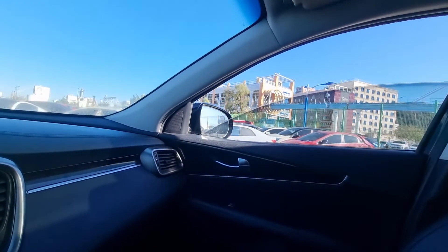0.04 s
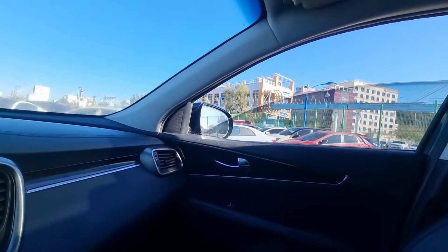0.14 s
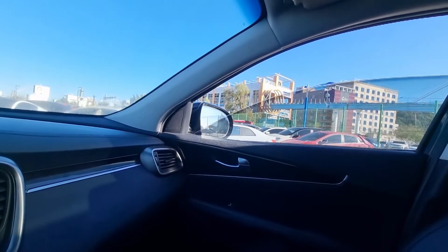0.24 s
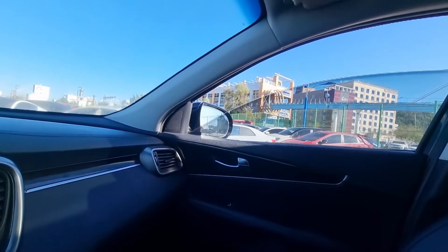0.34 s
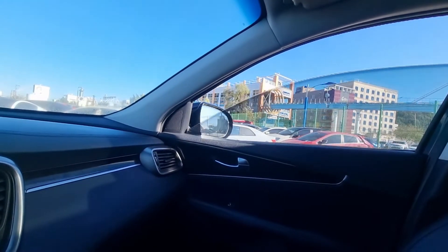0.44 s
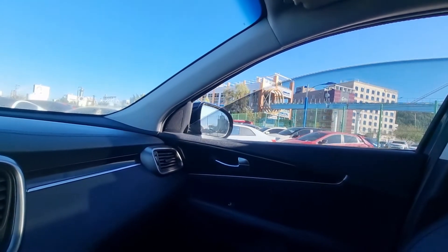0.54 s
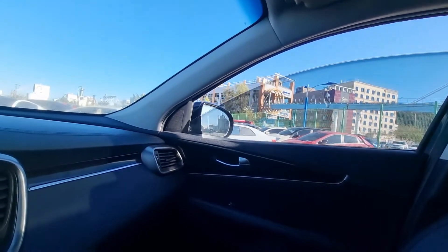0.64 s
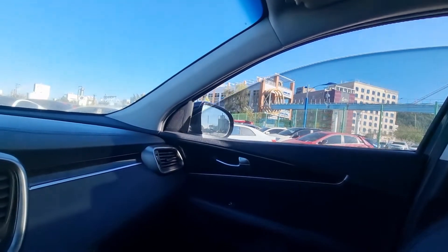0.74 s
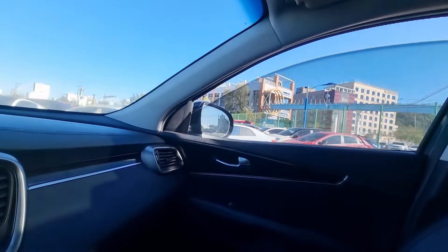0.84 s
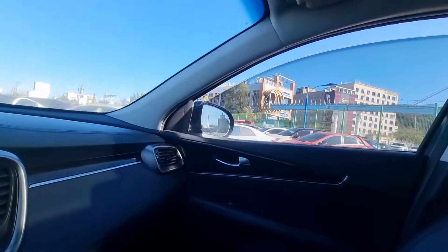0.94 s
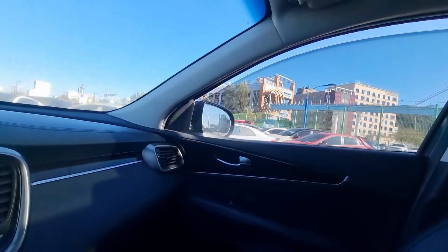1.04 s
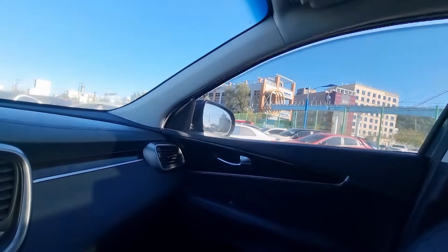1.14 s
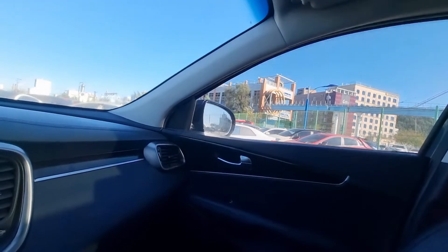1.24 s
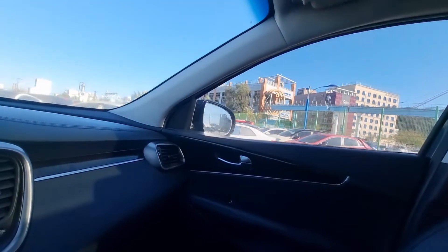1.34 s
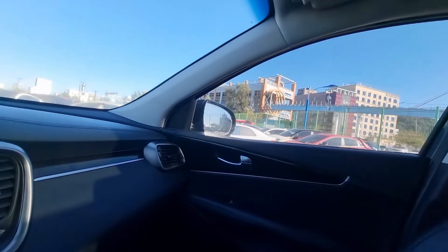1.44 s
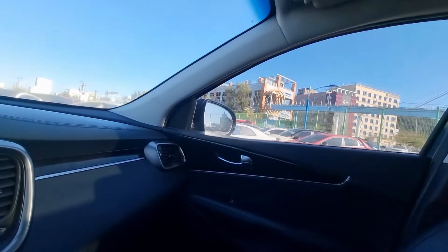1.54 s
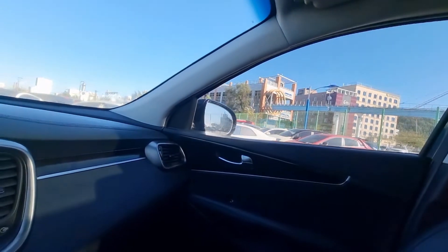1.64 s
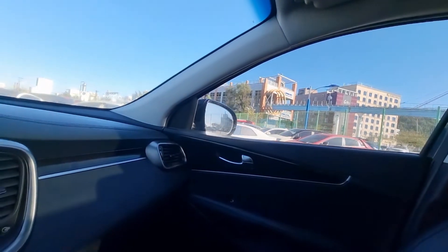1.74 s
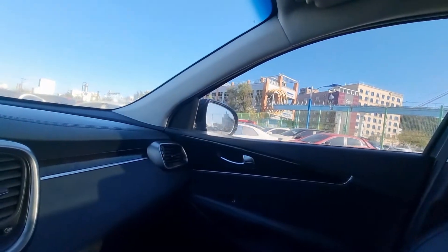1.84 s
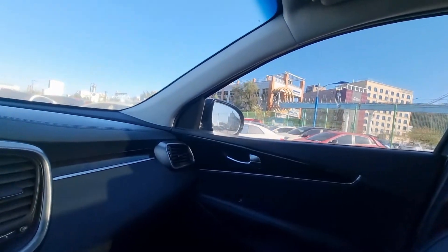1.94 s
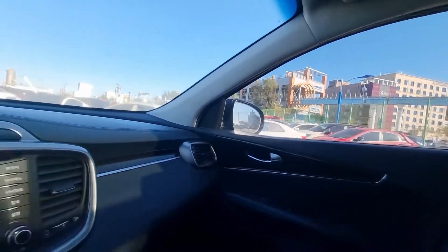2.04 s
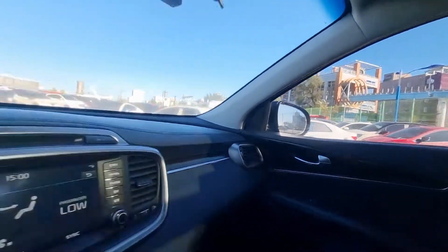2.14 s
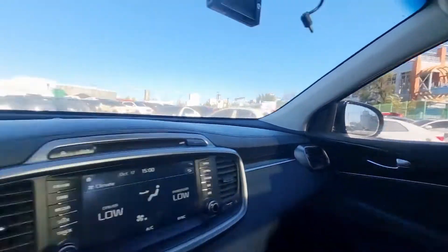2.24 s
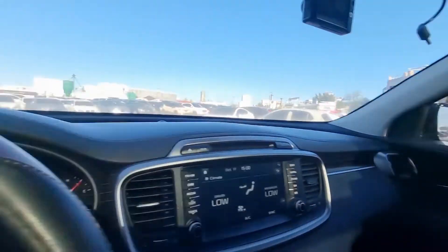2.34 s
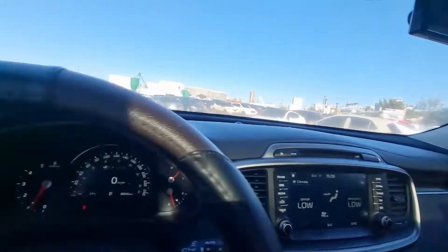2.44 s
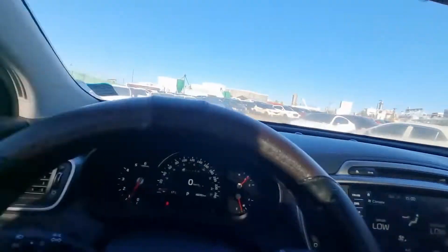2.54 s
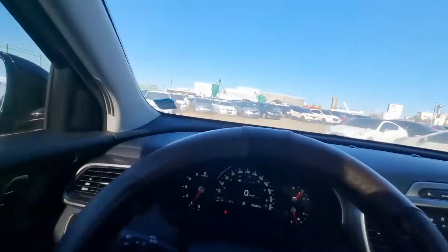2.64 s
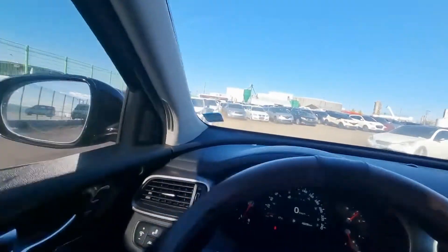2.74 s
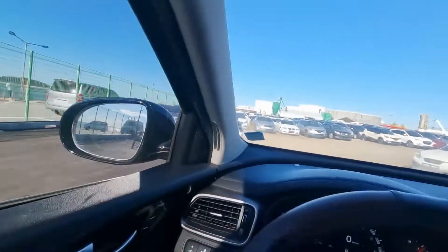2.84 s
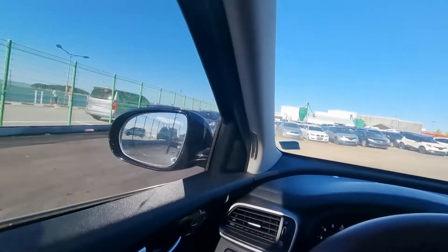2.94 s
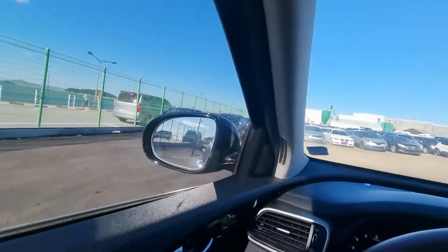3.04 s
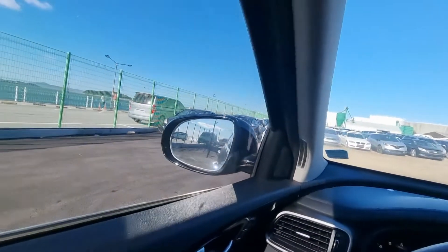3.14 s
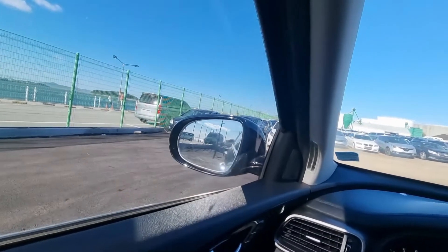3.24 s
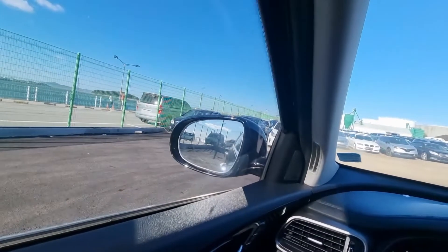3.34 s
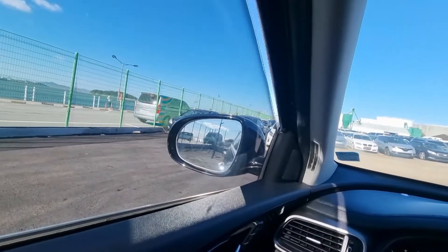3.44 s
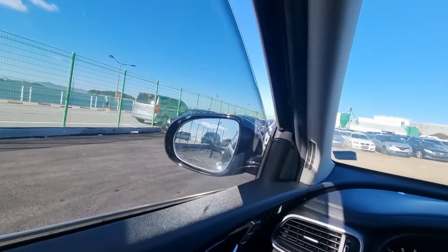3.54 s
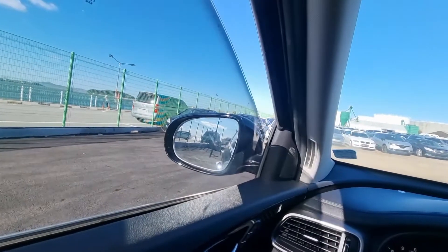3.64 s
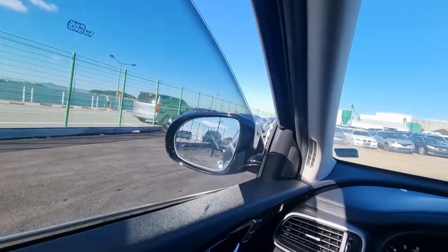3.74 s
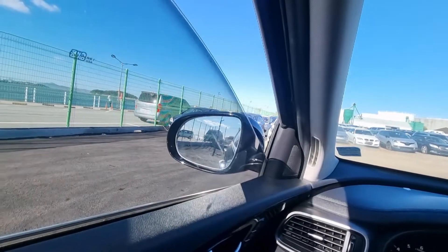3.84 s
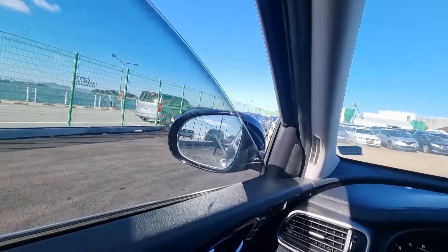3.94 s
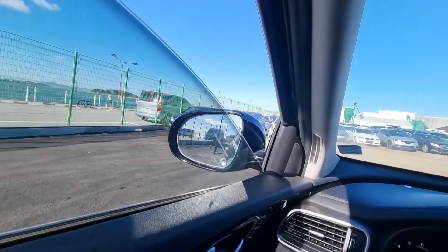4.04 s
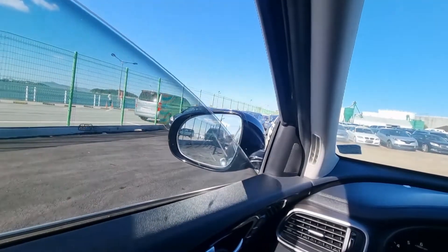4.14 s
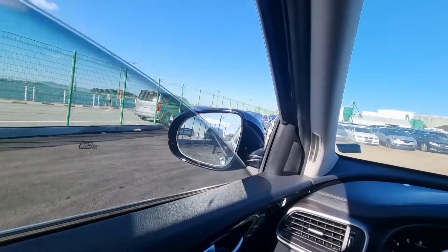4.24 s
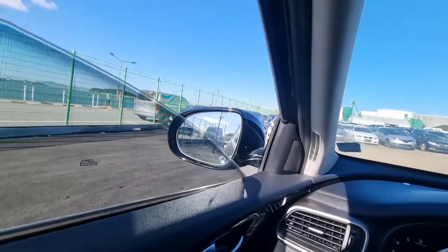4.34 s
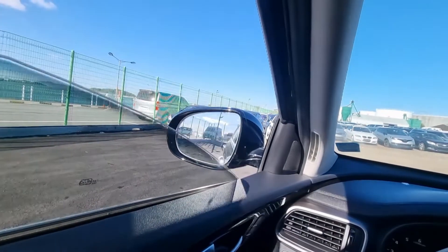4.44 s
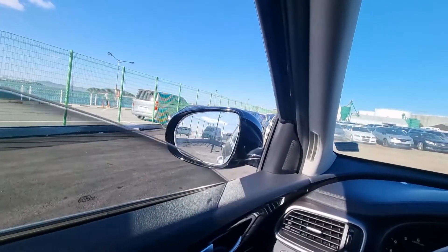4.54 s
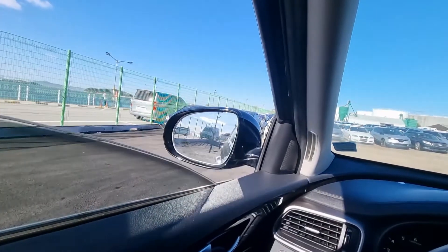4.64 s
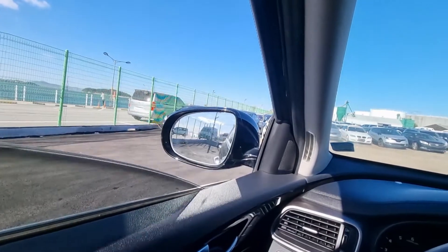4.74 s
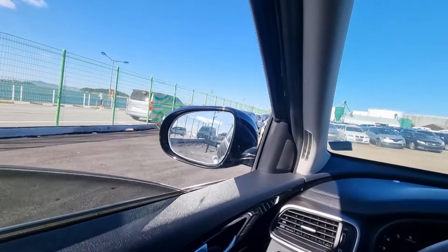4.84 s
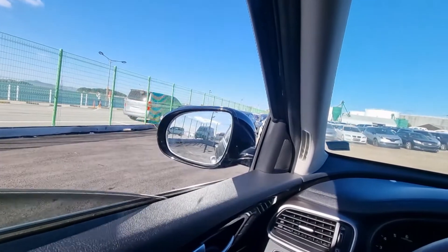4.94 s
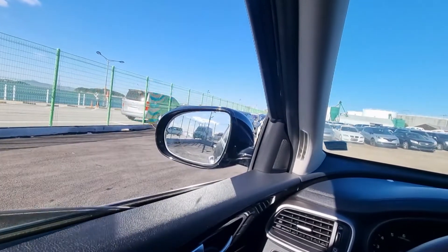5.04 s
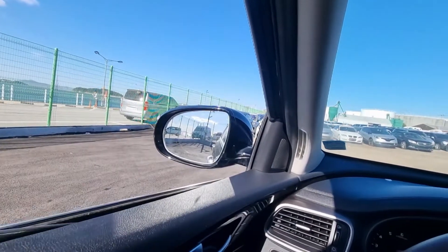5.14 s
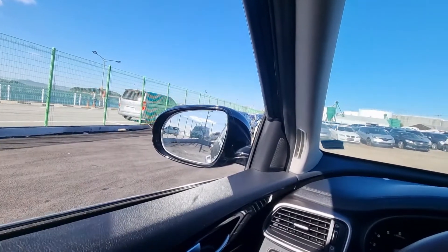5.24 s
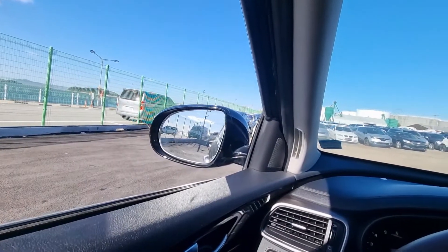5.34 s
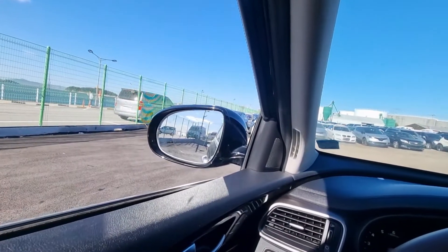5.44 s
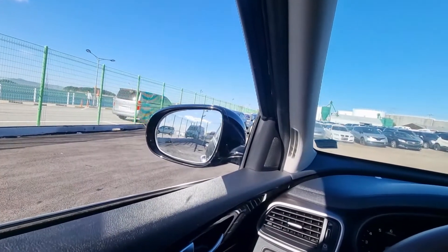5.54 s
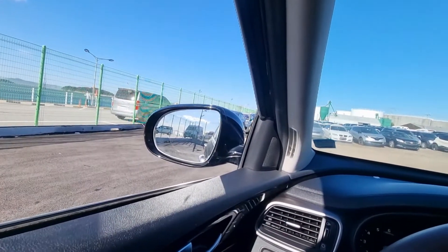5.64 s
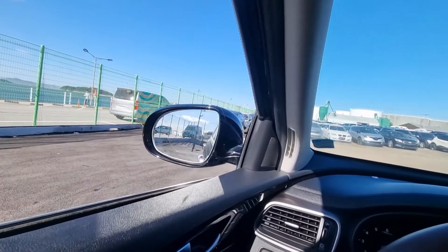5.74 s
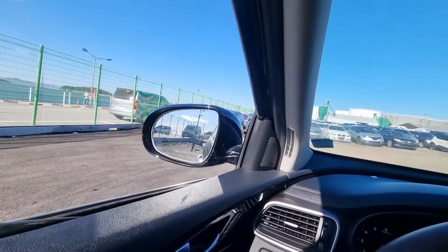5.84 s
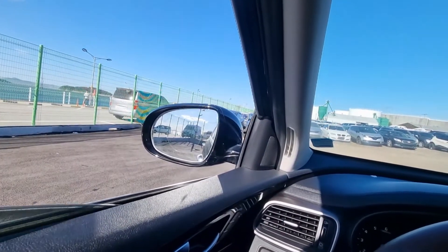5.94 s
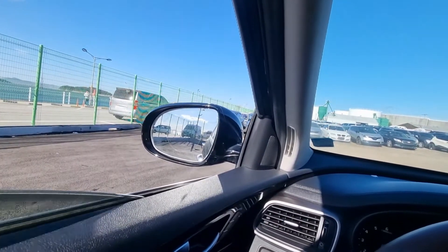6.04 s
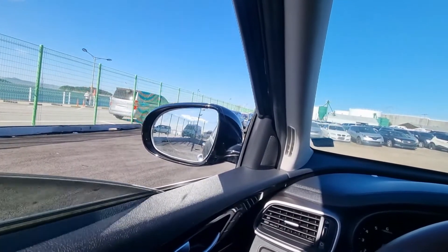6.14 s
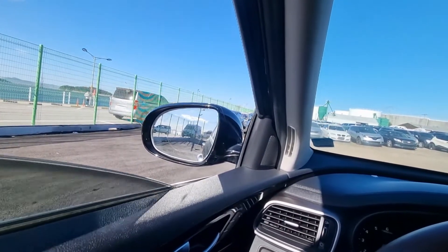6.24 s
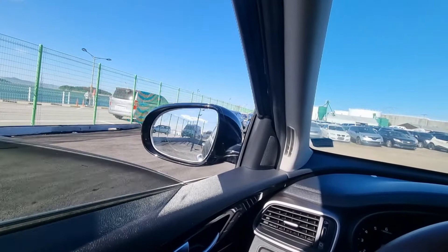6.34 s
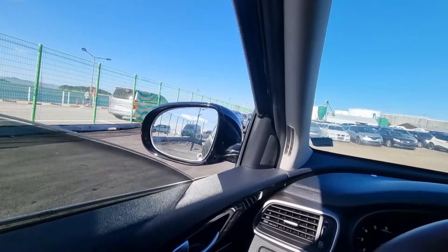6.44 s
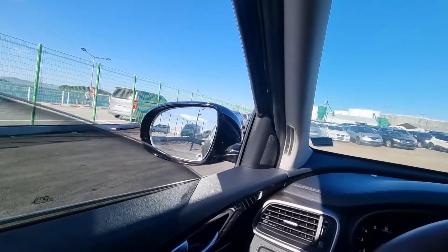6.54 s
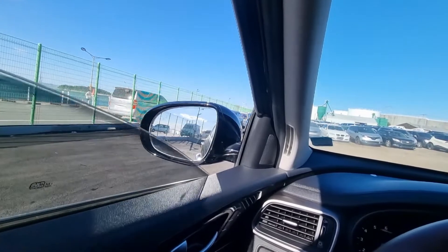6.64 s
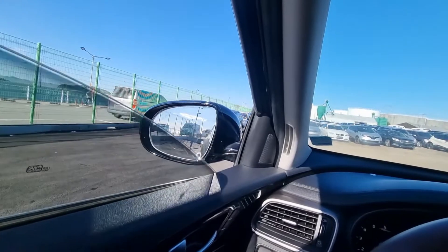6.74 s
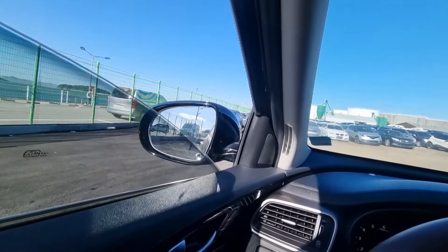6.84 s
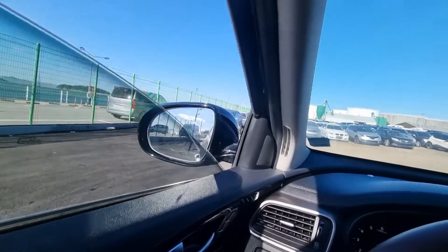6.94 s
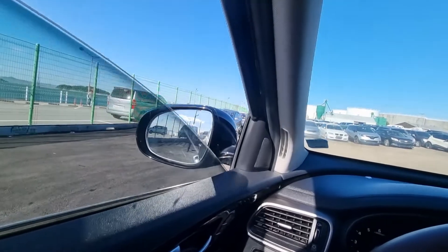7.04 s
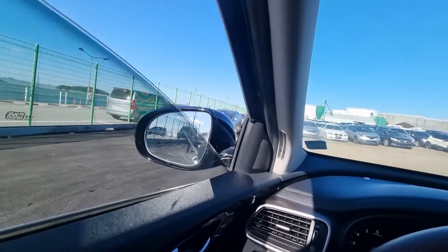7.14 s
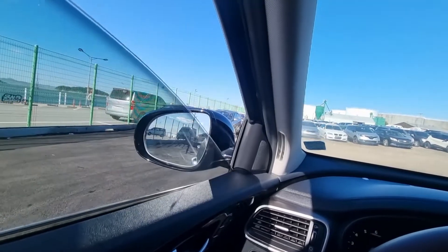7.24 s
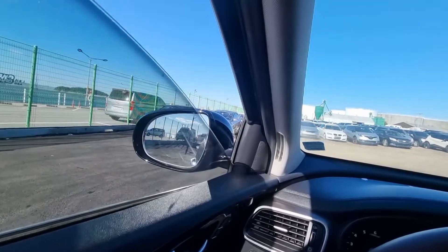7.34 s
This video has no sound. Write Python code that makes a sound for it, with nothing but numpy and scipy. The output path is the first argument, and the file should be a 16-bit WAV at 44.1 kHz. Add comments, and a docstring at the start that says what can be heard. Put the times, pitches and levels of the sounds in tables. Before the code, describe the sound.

Power windows whine, slide and thud up and down inside a parked car, over a low idling engine hum.

```python
"""Inside a parked car, with the engine idling and the ventilation on. The passenger window winds up and
thuds shut. Another slides faintly while the listener turns; the driver's window breaks free of its seal
with a double thud, winds down, letting the outdoors in, stops, and winds up again. Motors radiate
harmonics of their rotation, friction of glass on rubber hisses, and impacts excite the modes of the door.
Beneath it all the engine's firing pulses boom. Two microphone ports, left and right, receive the sound."""
import sys
import numpy as np
from scipy import signal
from scipy.fft import rfft, irfft, next_fast_len
from scipy.io import wavfile
from scipy.ndimage import map_coordinates

SR = 44100
rng = np.random.default_rng(int(sys.argv[2]) if len(sys.argv) > 2 else 0)


def log_audio(samples):
    """Write samples as a 16-bit WAV file to the path given in sys.argv[1]."""
    # one column per channel
    frames = np.atleast_2d(samples).T
    # limit to full scale, then quantise
    limited = np.clip(frames, -1, 1)
    pcm = np.round(limited * 32767).astype(np.int16)
    wavfile.write(sys.argv[1], SR, pcm)


N = 325458
TIME = np.arange(N) / SR
FFT_SIZE = next_fast_len(N + 8192, True)
FREQS = np.maximum(np.arange(FFT_SIZE // 2 + 1) * SR / FFT_SIZE, 1)

# window runs: (start [s], stop [s], glass height at start [0-1], glass height at stop [0-1])
PASSENGER_RUN = (0.24, 1.5, .45, 1)
FAR_RUN = (2.04, 3.27, .05, .6)
DOWN_RUN = (3.34, 5.435, 1, 0)
UP_RUN = (5.68, 7.38, 0, .72)
# friction spectra of glass on rubber: (frequency [Hz], relative density [dB])
PASSENGER_FRICTION = [(160, -11), (260, 11), (400, -5.5), (600, 3), (800, 6), (1100, -3.5), (1800, -6.5),
                      (2700, -7.3), (3300, -7), (5000, -10), (6800, -15.5), (9000, -23.5), (13000, -35),
                      (16000, -31)]
FAR_FRICTION = [(300, -4), (700, -10), (1200, -6), (2200, -8.5), (3500, -13), (5000, -14), (8000, -16),
                (11000, -25), (14000, -25), (16000, -22)]
DOWN_FRICTION = [(160, 1), (260, 4), (400, -9), (600, -10), (800, -19), (1100, -17.5), (1800, -19.5),
                 (2700, -17.5), (3300, -13), (4800, -16), (5600, -19), (6800, -15.5), (9000, -19.5),
                 (13000, -25.5), (16000, -22)]
UP_FRICTION = [(160, 6), (260, 5), (400, -2), (600, -6), (800, -8.5), (1100, -12.5), (1800, -15.5),
               (2700, -16.5), (3300, -8.5), (4800, -17), (5600, -20), (6800, -17.5), (9000, -24),
               (13000, -31.5), (16000, -27)]
# gearbox partials: (order [multiple of rotor rate], level [dB])
PASSENGER_GEARS = [(3, -61.5), (4, -70), (5, -63), (7, -62.5), (9, -81), (16, -69.5)]
DOWN_GEARS = [(2, -53.5), (3, -58.5), (4, -66.5), (5, -62.5), (6, -77), (7, -67.5), (27, -67.5)]
UP_GEARS = [(2, -56.5), (3, -65.5), (4, -68), (7, -65), (16, -91)]
# door resonating with the motor: (start [s], end [s], hum gain [dB], whine gain [dB])
DOOR_SWELLS = [(3.49, 3.82, 14, 2), (4.64, 4.85, 1, 9), (6.92, 7.35, 0, 9.5)]
# low thuds of windows starting and stopping, plus two soft handling bumps during the turn:
# (time [s], impulse level [dB], duration [s])
LOW_THUDS = [(0.239, -8, 0.024), (1.49, -8.7, 0.0055), (2.445, -35, .004), (2.98, -32, .004),
             (3.275, -7.5, 0.0058), (3.323, -5.5, 0.0035), (5.432, -31, 0.0026), (5.663, -33, 0.001),
             (5.682, -27, 0.0074)]
# door panel modes: (frequency [Hz], level [dB], t60 [s])
DOOR_MODES = [(43.04, -51, .2), (73.2, -5, 0.26), (96.3, -2.5, 0.092), (119.7, 0, 0.14), (159.4, -10, 0.18),
              (250.4, -3.5, .1), (295, -15.5, 0.24), (477, -8, 0.076)]
# switch, gear and seal contacts:
# (time [s], level [dB], t60 [s], ring frequency [Hz], relative ring level [dB], treble edge [Hz])
CONTACTS = [(0.226, -38, 0.05, 1060, 7, 4500), (0.236, -35, 0.031, 1030, -8, 2450),
            (1.362, -45, 0.22, 1250, -7, 7000), (1.492, -34, 0.11, 500, 4, 2490),
            (1.825, -43, 0.06, 1200, -1, 3000), (1.846, -40, 0.052, 7720, -4, 14900),
            (2.040, -50.5, .04, 800, 12, 3900), (2.445, -50.5, 0.06, 1400, 2, 2500),
            (3.263, -37, 0.15, 705, -5, 2000), (3.275, -22.5, 0.135, 726, -3, 2800),
            (3.313, -28.5, 0.045, 1200, -13, 10000), (3.322, -19, 0.048, 2900, -4, 9000),
            (3.326, -19, 0.06, 470, -1.5, 2600), (3.662, -34.5, 0.062, 1370, -7, 5000),
            (5.303, -42, 0.057, 700, -17, 4000), (5.431, -41, 0.093, 705, -20, 3340),
            (5.635, -30, 0.063, 2750, -2, 3400), (5.642, -38.5, 0.16, 480, 8, 2800),
            (5.662, -37.5, 0.12, 860, 5, 1580), (5.697, -35.5, 0.051, 364, 5.5, 5430),
            (6.167, -32.5, .035, 4800, -9, 8000)]
# contact noise: (frequency [Hz], relative density [dB])
CONTACT_SPECTRUM = [(120, 3.5), (300, 3), (450, -5), (800, 1.5), (1600, -1), (3000, -6), (6000, -7),
                    (15000, -8)]
# thin high squeaks: (time [s], duration [s], start frequency [Hz], end frequency [Hz], level [dB])
SQUEAK_GLIDES = [(2.94, .035, 13200, 15800, -75), (3.02, 0.054, 14100, 14700, -64),
                 (3.045, .1, 13750, 13900, -68), (3.06, 0.16, 15100, 15300, -73),
                 (3.151, 0.16, 13600, 13750, -70)]
# engine boom: (order [multiple of firing rate], level [dB], gain once turned [dB], gain once open [dB])
ENGINE_HARMONICS = [(1, -39, -.5, -3.5), (2, -42, -.5, -1.5), (3, -49, 7, -3), (4, -47, 0, -.5),
                    (5, -61, 1, 0), (7, -69, 6, 0)]
# ventilation blower tones: (frequency [Hz], level [dB])
BLOWER_PARTIALS = [(183, -74), (237, -66.5), (476, -65.5), (676, -66)]
# ambient noise inside and outside: (frequency [Hz], relative density [dB])
CABIN_SPECTRUM = [(20, 19), (42, 20), (65, 14.5), (110, 13), (170, -2.5), (250, 0), (400, -3), (520, -2.5),
                  (750, -4.5), (1000, -17), (1500, -18), (3500, -30.5), (6000, -41.5), (15000, -54.5)]
OUTDOOR_SPECTRUM = [(35, 9), (65, -11.5), (92, 8.5), (130, -11), (200, -23), (300, -13.5), (500, -30),
                    (800, -32), (1200, -32), (2500, -36), (5000, -49), (15000, -64)]
# power arriving straight from a source at nearness 1: (frequency [Hz], share [0-1])
DIRECT_SHARE = [(200, 0.29), (500, 0.1), (1000, 1), (1800, 0.61), (3500, 0.64), (7500, 0.17),
                (10000, 0.071), (15000, 0.14)]
# microphone port responses: (frequency [Hz], left gain [dB], right gain [dB])
PORT_RESPONSE = [(30, 2.5, 0), (80, 0.3, -2.3), (675, 0.67, -1.74), (1110, 4, 0.5), (2120, -7, -1.5),
                 (2950, 2, 2.5), (3900, -1, 5), (4600, -2, 0), (5700, -4.5, 1), (7330, -2, 2.5),
                 (10200, -6.5, -10.5), (13260, -0.5, 5), (16004, -4, -10)]

SEAL_DEPTH, SEAL_EDGE = .072, .006   # shares of the travel: the top seal's reach, and its soft edge
SUNK_HEIGHT = .22   # below this height the door hides the glass and the guides let it run freely
PORT_LAG_S = 0.0004265   # direct sound reaches the right port this much later


def driver_window_down():
    """Unloading: the driver's window leaves its seal and sinks, speeding up as the guides let it go."""
    drive = motor(DOWN_RUN, DOWN_GEARS, rotor_hz=118.7, free_speedup=.055,
                  hum_db=-50, whine_db=-60.5, brush_jitter_rad=1.1)
    return drive + slide(DOWN_RUN, DOWN_FRICTION, nearness=0.64, rumble_db=-48,
                         friction_db=-42, rise_db=6, sunk_db=-3, seal_db=5.5,
                         sizzle_hz=5500, sizzle_db=1, sizzle_rise_db=0, sizzle_sunk_db=-4.5,
                         ring_hz=2780, ring_db=-13.5, ring_t60=.0027)


def driver_window_up():
    """Shielding: the driver's window brightens as it rises out of the door that hid it."""
    drive = motor(UP_RUN, UP_GEARS, rotor_hz=92.9, free_speedup=.018,
                  hum_db=-53, whine_db=-66, brush_jitter_rad=0.8)
    return drive + slide(UP_RUN, UP_FRICTION, nearness=1.27, rumble_db=-52.7,
                         friction_db=-44, rise_db=-3, sunk_db=-2.5,
                         sizzle_hz=5800, sizzle_db=7.3, sizzle_rise_db=3, sizzle_sunk_db=-9.5,
                         ring_hz=2700, ring_db=-12)


def passenger_window():
    """Frictional loading: the top seal slows the passenger window's motor and raises the hiss."""
    drive = motor(PASSENGER_RUN, PASSENGER_GEARS, rotor_hz=97.7, free_speedup=0,
                  hum_db=-49.5, whine_db=-64, brush_jitter_rad=0.5)
    return drive + slide(PASSENGER_RUN, PASSENGER_FRICTION, nearness=0.4, rumble_db=-60.5,
                         friction_db=-49.9, rise_db=1, sunk_db=0, seal_db=6.3,
                         sizzle_hz=9300, sizzle_db=10, sizzle_rise_db=12, sizzle_sunk_db=0,
                         ring_hz=3200, ring_db=-17, ring_t60=.0025)


def far_window():
    """Attenuation with distance: a window further off is heard only as faint, mostly diffuse sliding."""
    return slide(FAR_RUN, FAR_FRICTION, nearness=0.3, rumble_db=-61,
                 friction_db=-56.3, rise_db=6, sunk_db=-7.5,
                 sizzle_hz=4800, sizzle_db=1.8, sizzle_rise_db=15, sizzle_sunk_db=-8,
                 ring_hz=2700, ring_db=-26)


def motor(run, gear_orders, rotor_hz, free_speedup, hum_db, whine_db, brush_jitter_rad,
          seal_slowing=.045, start_slowing=.1, settle_s=.05, wobble=0.0035, roughness=.35):
    """Rotational harmonics: unbalance hums, gears buzz, and brushes whine over eight commutator bars."""
    _, sunk, sealed = glass_position(run)
    starting = np.exp(-np.maximum(TIME - run[0], 0) / settle_s)
    hz = rotor_hz * (1 + free_speedup * sunk - seal_slowing * sealed - start_slowing * starting)
    for start, end, hum_gain_db, whine_gain_db in DOOR_SWELLS:
        swell = gate(start, end, rise_s=.08, fall_s=.08)
        hum_db = hum_db + hum_gain_db * swell
        whine_db = whine_db + whine_gain_db * swell
    phase = 2 * np.pi * np.cumsum(hz * (1 + wobble * drift(20))) / SR
    hum = from_db(hum_db) * tone(phase, rotor_hz)
    gears = sum(from_db(db) * (1 + roughness * drift(30)) * tone(order * phase, order * rotor_hz)
                for order, db in gear_orders)
    flutter = brush_jitter_rad * drift(60)
    whine = from_db(whine_db + 3 * drift(35)) * tone(8 * phase + flutter, 8 * rotor_hz)
    return gate(*run[:2]) * (hum + gears + whine)


def slide(run, spectrum, nearness, rumble_db, friction_db, rise_db, sunk_db, sizzle_hz, sizzle_db,
          sizzle_rise_db, sizzle_sunk_db, ring_hz, ring_db, ring_t60=0.0033, seal_db=0, rumble_hz=1100):
    """Sliding friction: glass on rubber hisses and rings, varying with height; the cable drive rumbles."""
    height, sunk, sealed = glass_position(run)
    above_half = height - .5
    noise = cabin_noise(spectrum, nearness)
    rumble = shape(noise, 1 / (1 + (FREQS / rumble_hz) ** 4))
    sizzle = shape(noise, 1 / (1 + (sizzle_hz / FREQS) ** 6))
    sizzle_gain = from_db(sizzle_db + sizzle_rise_db * above_half + sizzle_sunk_db * sunk)
    hiss = noise - rumble + (sizzle_gain - 1) * sizzle
    rubber = from_db(ring_db + 1.8 * drift(6)) * unit_rms(ring(hiss, ring_hz, ring_t60))
    grip_db = friction_db + rise_db * above_half + sunk_db * sunk + seal_db * sealed
    grain_db = 0.5 * drift(220) + 0.66 * drift(15)
    friction = from_db(grip_db + grain_db) * (hiss + rubber)
    return gate(*run[:2], fall_s=.04) * (from_db(rumble_db) * rumble + friction)


def glass_position(run):
    """Uniform motion: the glass's height, how far it is sunk in the door, and the seal's grip (all 0-1)."""
    height = np.interp(TIME, run[:2], run[2:])
    sunk = np.exp(-(height / SUNK_HEIGHT) ** 2)
    sealed = .5 + .5 * np.tanh((height - 1 + SEAL_DEPTH) / SEAL_EDGE)
    return height, sunk, sealed


def thuds(rebound_s=.03, rebound_db=-5.5, rebound_stretch=1.9, left_db=0.5):
    """Modal excitation: window jolts and handling bumps boom; shorter pushes reach higher modes."""
    force = np.zeros(N)
    rebounds = [(start + rebound_s, db + rebound_db, length * rebound_stretch)
                for start, db, length in LOW_THUDS]
    for start, db, length in [*LOW_THUDS, *rebounds]:
        push = np.sin(np.pi * np.clip((TIME - start) / length, 0, 1)) ** 2
        force += from_db(db) * push / push.sum()
    # neighbouring modes push the air in opposite directions
    boom = sum((-1) ** (k + 1) * from_db(db) * ring(force, hz, t60)
               for k, (hz, db, t60) in enumerate(DOOR_MODES))
    return np.array([from_db(left_db) * boom, np.interp(TIME - PORT_LAG_S, TIME, boom)])


def clacks(chatter_db=0.5, ring_t60=0.025, attack_s=.0012):
    """Damped impacts: parts meet in an uneven rattle that dies in the door, each with its own ring."""
    out, size = np.zeros((2, N)), SR // 5
    rattle = cabin_noise(CONTACT_SPECTRUM, nearness=0.57) * from_db(chatter_db * drift(260))
    age = TIME[:size]
    for start, db, t60, ring_hz, ring_db, edge_hz in CONTACTS:
        at = round(start * SR)
        contact = rattle[:, at:at + size]
        knock = unit_rms(lowpass(contact, edge_hz))
        ringing = from_db(ring_db) * unit_rms(ring(contact, ring_hz, ring_t60))
        envelope = from_db(db - 60 * age / t60) * (1 - np.exp(-age / attack_s))
        out[:, at:at + size] += envelope * (knock + ringing)
    return out


def squeaks(waver_hz=130.0, roughness=0.36, right_db=5):
    """Random modulation of pitch and level roughens faint, gliding squeaks near the right port."""
    out, size = np.zeros(N), SR // 5
    waver = waver_hz * drift(700)
    flicker = 1 + roughness * drift(180)
    for start, length, start_hz, end_hz, db in SQUEAK_GLIDES:
        span = slice(round(start * SR), round(start * SR) + size)
        progress = np.clip(TIME[:size] / length, 0, 1)
        hz = start_hz + (end_hz - start_hz) * progress + waver[span]
        out[span] += from_db(db) * np.sin(np.pi * progress) * np.sin(2 * np.pi * np.cumsum(hz) / SR)
    return out * flicker * from_db([[0], [right_db]])


def engine(firing_hz=26.5, wander=.003, unevenness_db=.4, turn_span_s=(2.1, 2.7)):
    """Periodic firing booms in low harmonics that shift as the listener turns and thin as a window opens."""
    hz = firing_hz * (1 + wander * drift(2))
    phase = 2 * np.pi * np.cumsum(hz) / SR
    turned = np.interp(TIME, turn_span_s, [0, 1])
    _, leak = window_opening()
    boom = np.zeros((2, N))
    for order, db, turn_db, open_db in ENGINE_HARMONICS:
        level_db = db + turn_db * turned + open_db * leak + unevenness_db * drift(7.2)
        boom -= from_db(level_db) * tone(order * phase, order * firing_hz)
    return boom * pan(left_db=-1.3 - 2.2 * leak)


def blower(wander_rad=0.49):
    """Tonal fan noise: the ventilation holds a few steady partials whose phases wander."""
    return sum(from_db(db) * tone(2 * np.pi * hz * TIME + wander_rad * drift(12), hz)
               for hz, db in BLOWER_PARTIALS)


def outdoors(small_gap_db=-44, growth_db=4.5):
    """Transmission through an aperture: outdoor noise grows as the driver's window opens."""
    gap, leak = window_opening()
    gain = leak * from_db(small_gap_db + growth_db * gap)
    return gain * cabin_noise(OUTDOOR_SPECTRUM, nearness=0.63) * pan(left_db=-2.5)


def window_opening(leak_gap=.12):
    """Leakage saturates at a small opening: the driver's window gap and what it lets through (both 0-1)."""
    height = np.interp(TIME, [*DOWN_RUN[:2], *UP_RUN[:2]], [*DOWN_RUN[2:], *UP_RUN[2:]])
    gap = 1 - height
    return gap, 1 - np.exp(-gap / leak_gap)


def cabin_rumble(level_db=-42.4):
    """Stationary noise: a low, mostly diffuse rumble fills the cabin."""
    return from_db(level_db) * cabin_noise(CABIN_SPECTRUM, nearness=0.34)


def cabin_noise(spectrum, nearness, coherence_hz=365, ripple_db=2.4):
    """Direct and diffuse fields: one reaches the left port first, the other is coherent only in the bass."""
    direct, mid, side = rfft(rng.standard_normal((3, FFT_SIZE)))
    share = np.clip(nearness * per_frequency(DIRECT_SHARE)[0], 0, 1)
    coherence = .96 / (1 + (FREQS / coherence_hz) ** 4)
    diffuse = np.sqrt((1 + coherence) / 2) * mid + np.sqrt((1 - coherence) / 2) * side * [[1], [-1]]
    lag = np.exp(-2j * np.pi * FREQS * PORT_LAG_S * [[0], [1]])
    field = np.sqrt(share) * direct * lag + np.sqrt(1 - share) * diffuse
    # reflections off glass and trim ripple the spectrum at each port
    ripple_grid = np.linspace(0, SR / 2, 500)
    ripple = np.array([np.interp(FREQS, ripple_grid, row) for row in rng.standard_normal((2, 500))])
    colour = from_db(per_frequency(spectrum) + ripple_db * ripple * (1 - coherence))
    low_cut = 1 / np.sqrt(1 + (.8 * spectrum[0][0] / FREQS) ** 8)
    return unit_rms(irfft(colour * low_cut * field, FFT_SIZE)[:, :N])


def tone(phase, hz):
    """Path difference: a stereo partial of rms 1 reaches the right port later."""
    return np.sqrt(2) * np.cos(phase - 2 * np.pi * hz * PORT_LAG_S * np.array([[0], [1]]))


def ring(force, hz, t60):
    """Damped resonator: a unit impulse starts a decaying sine of height 1."""
    decay, step_rad = from_db(-60 / (t60 * SR)), 2 * np.pi * hz / SR
    feedback = [1, -2 * decay * np.cos(step_rad), decay * decay]
    return signal.lfilter([0, np.sin(step_rad)], feedback, force + 1e-18)


def drift(rate_hz):
    """Smooth random modulation with a spread near 1."""
    steps = rng.standard_normal(2048)
    return map_coordinates(steps, [TIME[::32] * rate_hz], order=3, mode="wrap").repeat(32)[:N]


def gate(start, stop, rise_s=.01, fall_s=.025):
    """Trapezoidal envelope: 1 from start to stop, with ramps outside."""
    return np.interp(TIME, [start - rise_s, start, stop, stop + fall_s], [0, 1, 1, 0])


def pan(left_db):
    """Level difference: stereo gains for left minus right in decibels."""
    return from_db(left_db * np.array([[.5], [-.5]]))


def per_frequency(rows):
    """Log-frequency interpolation of each column of a spectrum."""
    hz, *columns = np.transpose(rows)
    return np.array([np.interp(np.log(FREQS), np.log(hz), column) for column in columns])


def shape(x, gain):
    """Filtering by spectral multiplication."""
    return irfft(rfft(x, FFT_SIZE) * gain, FFT_SIZE)[..., :N]


def lowpass(x, hz):
    """Causal second-order low-pass."""
    return signal.sosfilt(signal.butter(2, hz, fs=SR, output="sos"), x)


def from_db(db):
    """Decibels to amplitude ratio."""
    return 10 ** (np.asarray(db) / 20)


def unit_rms(x):
    """Normalisation to unit power."""
    return x / np.sqrt(np.mean(x ** 2) + 1e-20)


def scene():
    """Superposition: four window runs, thuds, clacks and squeaks add to the idling car."""
    windows = passenger_window() + far_window() + driver_window_down() + driver_window_up()
    background = engine() + blower() + outdoors() + cabin_rumble()
    fade = gate(.01, TIME[-1] - .01, fall_s=.01)
    return fade * (windows + thuds() + clacks() + squeaks() + background)


def record(dry):
    """Frequency response: each port colours its channel, and a steep low-pass limits the band."""
    coloured = shape(dry, from_db(per_frequency(PORT_RESPONSE)))
    cutoff_hz = 15900
    return signal.sosfilt(signal.ellip(12, .1, 80, cutoff_hz, fs=SR, output="sos"), coloured)


dry = scene()
out = record(dry)
log_audio(out)
```